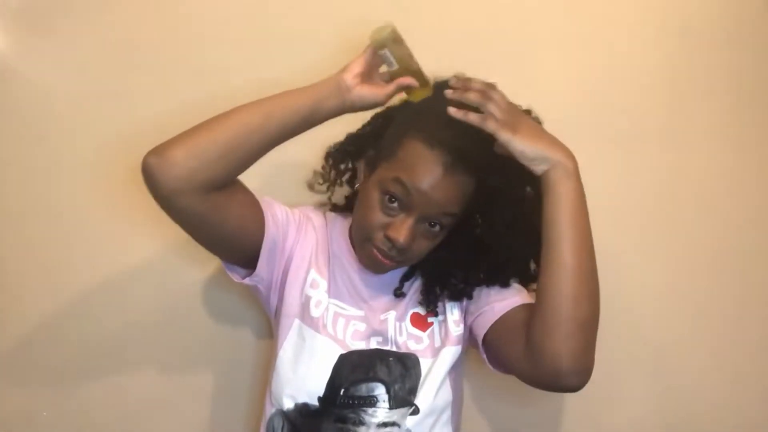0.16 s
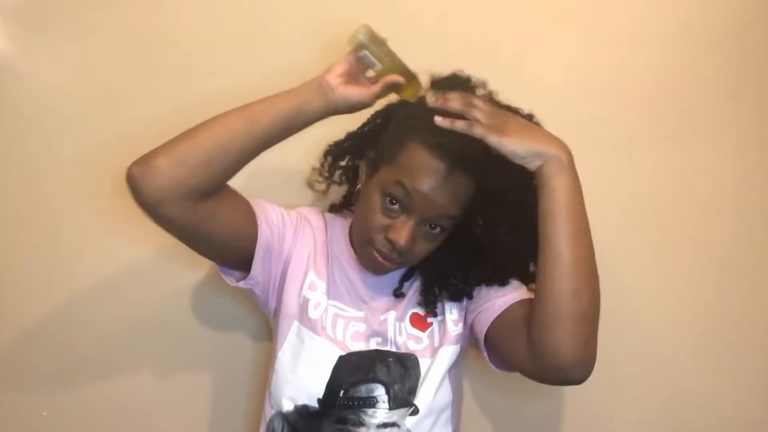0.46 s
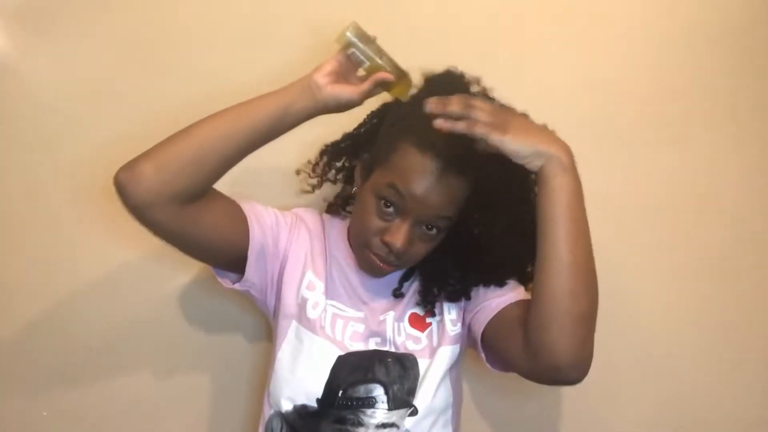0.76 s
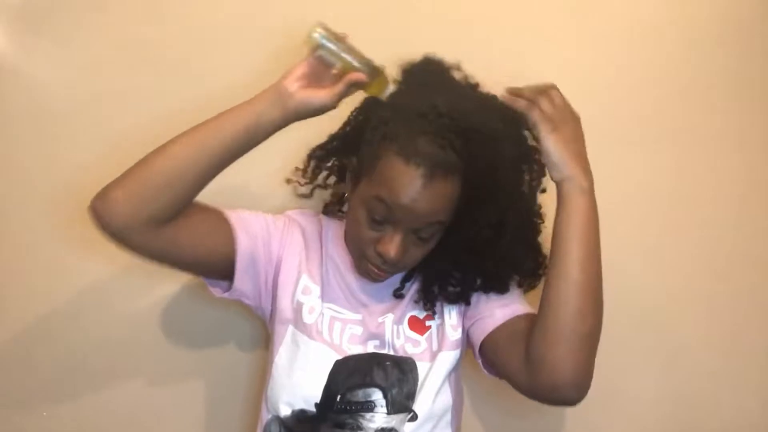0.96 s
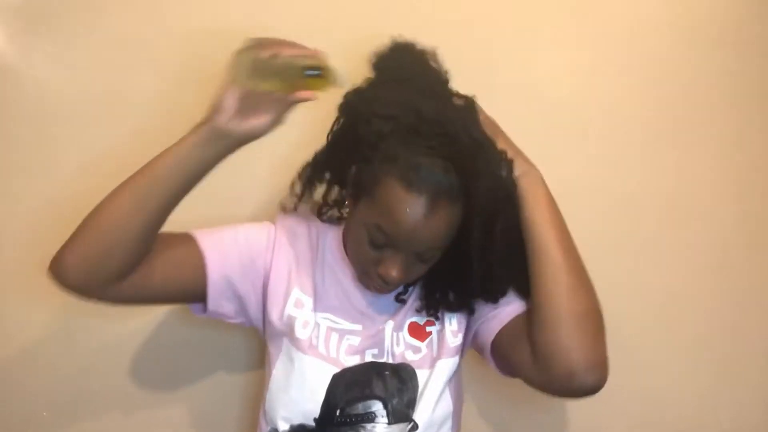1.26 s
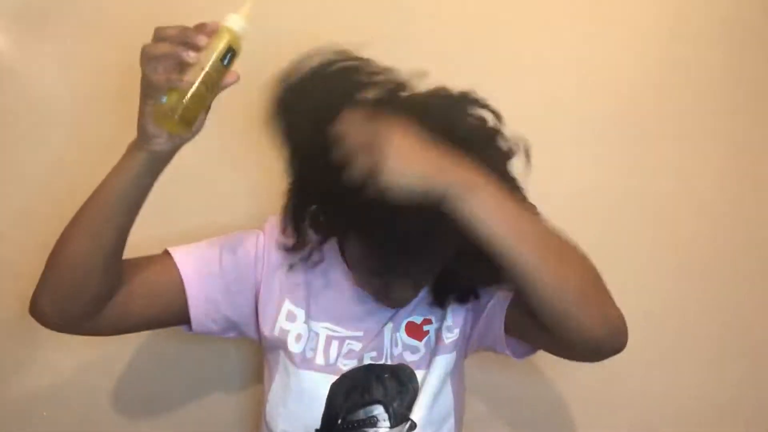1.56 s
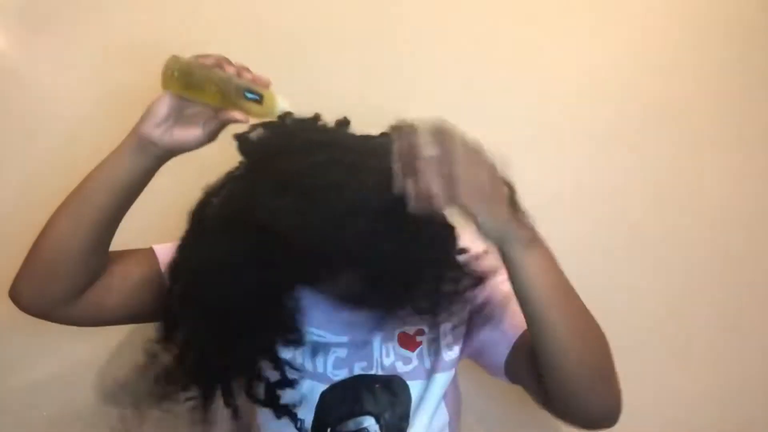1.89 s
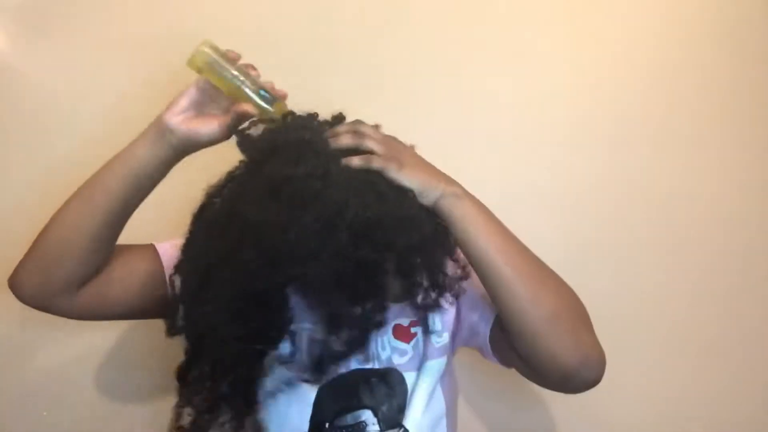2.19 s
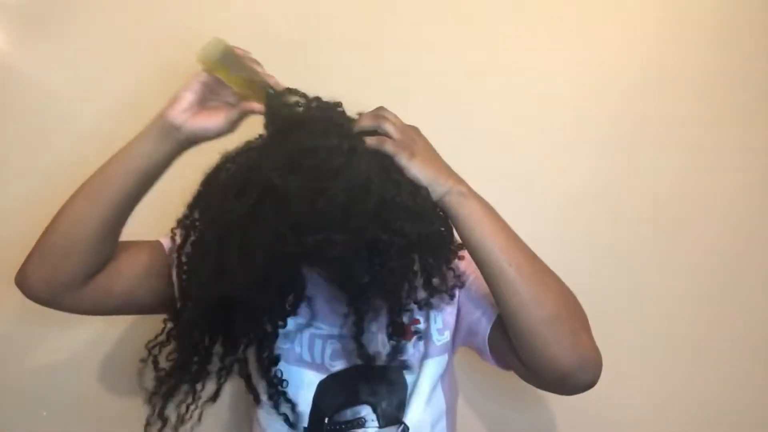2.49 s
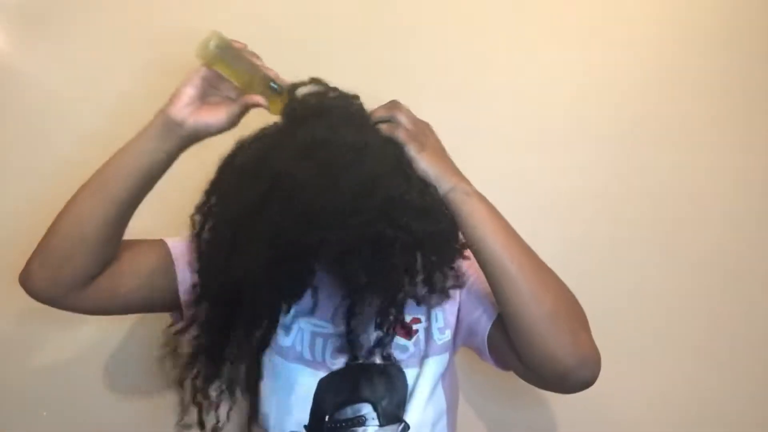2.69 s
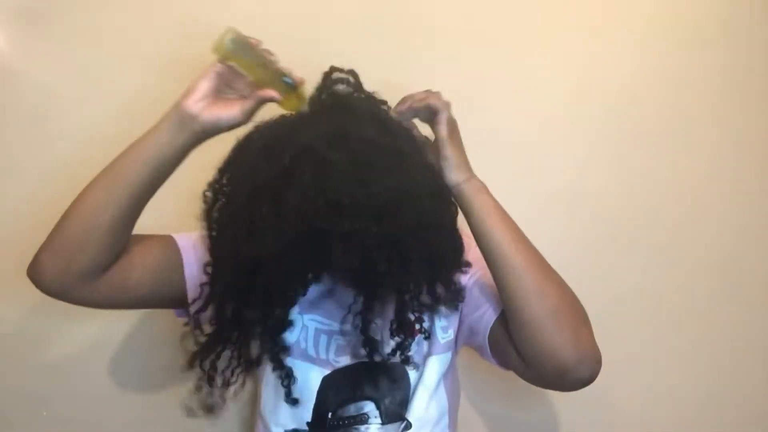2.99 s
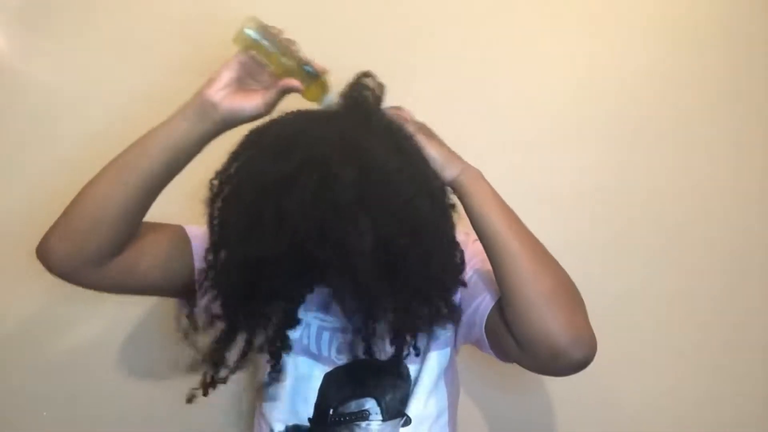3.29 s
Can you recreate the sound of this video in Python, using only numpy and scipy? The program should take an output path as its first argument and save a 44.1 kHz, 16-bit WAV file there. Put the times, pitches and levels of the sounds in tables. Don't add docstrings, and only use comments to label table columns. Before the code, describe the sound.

Fingertips rub a scalp through thick curly hair in soft uneven rustles, with sharp ticks and a few tiny bottle glugs midway, then fuller strokes; close small room, low air rumble, mono microphone.

```python
import sys
import numpy as np
from scipy import signal
from scipy.fft import rfft, irfft
from scipy.io import wavfile

SR = 44100
rng = np.random.default_rng(int(sys.argv[2]) if len(sys.argv) > 2 else 0)


def ratio_of_db(decibels):
    return 10 ** (np.asarray(decibels, float) / 20)


def wav_record(signal):
    frames = np.transpose(np.atleast_2d(signal))
    bounded = np.clip(frames, -1, 1)
    quanta = np.round(bounded * 32767).astype(np.int16)
    wavfile.write(sys.argv[1], SR, quanta)


N = 152145


def rms_one(x):
    return x / np.sqrt(np.mean(x ** 2) + 1e-20)


def coloured_noise(spectrum):
    hz, db = np.transpose(spectrum)
    bins_hz = np.maximum(np.fft.rfftfreq(N, 1 / SR), 1)
    gain = ratio_of_db(np.interp(np.log(bins_hz), np.log(hz), db))
    return rms_one(irfft(rfft(rng.standard_normal(N)) * gain, N))


def drift(rate_hz):
    r = np.exp(-2 * np.pi * rate_hz / SR)
    wander = signal.lfilter([1], [1, -2 * r, r * r], rng.standard_normal(N + SR))
    return rms_one(wander[SR:])


def resonate(x, pitch_hz, width_hz):
    r = np.exp(-np.pi * width_hz / SR)
    numerator = (1 - r * r) / 2 * np.array([1, 0, -1])
    return signal.lfilter(numerator, [1, -2 * r * np.cos(2 * np.pi * pitch_hz / SR), r * r], x)


def add(out, start_s, sound):
    i = int(start_s * SR)
    out[i:i + len(sound)] += sound[:len(out) - i]


def sine(pitch_hz):
    return np.sqrt(2) * np.sin(2 * np.pi * pitch_hz * np.arange(N) / SR)


# pitch_hz [Hz], level_db [dB per Hz]
RUMBLE_SPECTRUM = [(15, -102), (25, -30), (71, -3.5), (118, 1.5), (330, -14), (435, -20.5), (482, -16.5),
                   (525, -22), (800, -32.5), (1040, -33.5), (1760, -120)]
# pitch_hz [Hz], level_db [dB per Hz]
AIR_HISS = [(300, -40),
            (600, 0), (1000, -4), (1500, -9.5), (2600, -11.5), (5000, -15.5), (7800, -18.5),
                 (8300, -21.5), (16000, -24)]
# pitch_hz [Hz], width_hz [Hz], level_db [dB]
ROOM_MODES = [(83.2, 17.5, -52), (118.1, 18, -50), (171.2, 6.8, -57.5), (287.7, 19, -66), (321.6, 39, -60),
              (359.8, 9.1, -64.5),
              (217.3, 10.8, -66)]


def air_system():
    rumble = ratio_of_db(-46.5 + 1.24 * drift(3.6)) * coloured_noise(RUMBLE_SPECTRUM)
    hiss = ratio_of_db(-65 + 0.4 * drift(8.1)) * coloured_noise(AIR_HISS)
    hum = ratio_of_db(-61.5 + 1.2 * drift(3.2)) * sine(480)
    whine = ratio_of_db(-94) * sine(9438)
    out = rumble + hiss + hum + whine
    for pitch_hz, width_hz, level_db in ROOM_MODES:
        noise = rng.standard_normal(N + SR)
        noise = resonate(resonate(noise, pitch_hz, width_hz), pitch_hz, width_hz)
        out += ratio_of_db(level_db) * rms_one(noise[SR:])
    return out


# middle_s [s], length_s [s], level_db [dB], brightness_db [dB]
STROKES = [(0.082, 0.1, -70, 6), (0.351, .1, -67, -2), (0.452, 0.08, -67, 6.5), (0.569, 0.077, -68, -6),
           (0.68, 0.1, -67.5, 8.5), (0.792, 0.03, -68, 3), (0.912, 0.095, -65, -1), (1.006, 0.16, -67, 0),
           (1.209, 0.043, -57, -10), (1.221, 0.033, -55.5, -16), (1.308, 0.14, -65.5, 6),
           (1.377, 0.16, -79.5, 22.5), (1.579, 0.6, -74, 18), (2.104, 0.096, -66.5, 6.5),
           (2.195, 0.12, -64, 7.5), (2.459, 0.15, -57, -2.5), (2.706, 0.24, -64, -1),
           (2.821, 0.095, -65.5, -1), (2.883, 0.12, -62, 2.5), (2.981, 0.15, -58.5, -0.5),
           (3.002, 0.056, -53.5, -12), (3.039, 0.05, -60, -7), (3.126, 0.15, -61.5, 0.5),
           (3.226, 0.07, -57, -3), (3.262, 0.11, -58.5, 1), (3.378, 0.14, -66, -2), (1.123, .12, -75, 9),
           (1.795, 0.14, -75, 12.5), (3.445, 0.051, -85, 9)]
# pitch_hz [Hz], width_hz [Hz], level_db [dB], brightness_share [0-1]
HAIR_RESONANCES = [(1208, 200, -8, 0.65), (2230, 1000, -0.5, 0), (2683, 130, -10, 0.1),
                   (1850, 220, -12, 0.26), (2940, 1100, -19.5, 1), (4700, 1660, -10.5, 0.65),
                   (7800, 970, -17.5, 0.5), (11600, 7800, -18, 0.94), (6440, 2700, -21.5, 0.84)]


def finger_strokes():
    slips_per_s, slip_spread_db = 3000, 3.2
    t, out = np.arange(N) / SR, np.zeros(N)
    flicker = ratio_of_db(1.0 * drift(36.0))
    for pitch_hz, width_hz, level_db, share in HAIR_RESONANCES:
        sizes = ratio_of_db(slip_spread_db * np.minimum(rng.exponential(1, N), 5))
        sizes = sizes * rng.choice([-1, 1], N)
        slips = rms_one(sizes * (rng.random(N) < slips_per_s / SR))
        power = np.zeros(N)
        for middle_s, length_s, stroke_db, bright_db in STROKES:
            swell = np.exp(-8 * ((t - middle_s) / length_s) ** 2)
            power += ratio_of_db(2 * (stroke_db + share * bright_db)) * swell ** 2
        rustle = resonate(resonate(slips, pitch_hz, width_hz), pitch_hz, 2 * width_hz)
        out += ratio_of_db(level_db) * rms_one(rustle) * np.sqrt(power) * flicker
    return out


# start_s [s], peak_db [dB], pitch_hz [Hz], t60_s [s]
TICKS = [(1.2956, -38, 6900, 0.006), (1.2957, -44, 4200, 0.0025), (1.2959, -44, 2350, .008),
         (1.2981, -44, 6300, 0.0065), (1.3023, -34, 3580, 0.0054), (1.3021, -31.5, 2690, 0.0051),
         (1.302, -48, 4250, 0.0068), (1.3038, -44, 3730, 0.0089), (1.3045, -51, 6800, 0.0098),
         (1.305, -48.5, 930, 0.054), (1.3076, -34, 2630, 0.006), (1.3088, -41, 1800, 0.013),
         (1.3078, -46.5, 1320, 0.061), (1.3165, -46, 1750, 0.01), (1.4663, -31.5, 7000, 0.0032),
         (1.467, -38, 1060, 0.014), (1.4668, -35, 4360, 0.0056), (1.4662, -33, 2900, 0.008),
         (1.4685, -33, 3020, 0.0065), (1.467, -36.5, 1660, 0.025), (1.475, -38, 3800, 0.005),
         (1.4765, -39, 3570, .006), (1.4823, -44, 2920, .008), (1.4867, -45, 7260, 0.0059),
         (1.4874, -43, 4400, 0.0057), (1.4945, -49, 7700, 0.007), (1.4988, -46, 3200, .006),
         (1.4915, -38.5, 7500, 0.0057), (2.144, -38.5, 5100, 0.0054), (2.144, -34, 3000, .005),
         (2.1463, -20.5, 2035, 0.011), (2.147, -33, 2730, 0.015), (2.1461, -39, 3400, .012),
         (2.146, -31.5, 4560, 0.0092), (2.149, -46, 714, 0.018), (2.1547, -42, 2400, .01),
         (2.1758, -45, 4900, .004), (2.1793, -40.5, 7300, .005), (2.1789, -45, 11500, 0.0027),
         (2.188, -48, 8400, 0.0036), (2.2859, -31.5, 1960, 0.0061), (2.2862, -39, 617, 0.013),
         (2.2864, -45, 4200, 0.0045), (2.188, -50, 12100, .004), (2.8818, -44, 2190, .012),
         (3.0005, -40.5, 2600, 0.0094), (3.0002, -36.5, 1850, 0.013), (3.006, -42, 1800, 0.01),
         (3.007, -48, 2680, .007)]
# start_s [s], peak_db [dB], pitch_hz [Hz]
SNAPS = [(.551, -56, 2530), (.658, -55, 2710), (.791, -57, 2380), (.903, -53, 2430), (1.186, -57, 1970),
         (1.206, -46, 2230), (2.374, -52, 2240), (2.404, -49, 2350), (2.428, -56, 2240), (2.792, -56, 2070),
         (2.802, -56, 2550), (2.955, -50, 2220), (3.002, -50, 4700), (3.014, -44, 2620), (3.047, -50, 2660),
         (3.058, -50, 2700), (3.092, -52, 2640), (3.22, -45, 2140), (3.368, -54, 2650),
         (1.6115, -49.5, 2276), (2.317, -52, 1950), (.356, -62, 4300), (.449, -52, 2400), (.918, -56, 3800),
         (1.218, -46, 2600), (2.176, -50, 2100), (2.455, -46, 2300)]


def ticks_and_snaps():
    snap_t60_s, crack_t60_s, crackle_t60_s = 0.014, 0.0018, 0.04
    crack_db, crackle_db = 0, -14
    rise_cycles = 1.6
    out, t = np.zeros(N), np.arange(5000) / SR
    snaps = [(*snap, snap_t60_s) for snap in SNAPS]
    for start_s, peak_db, pitch_hz, t60_s in [*TICKS, *snaps]:
        rise = np.sin(np.pi / 2 * np.minimum(t * pitch_hz / rise_cycles, 1)) ** 2
        ring = np.sin(2 * np.pi * pitch_hz * t) * ratio_of_db(-60 * t / t60_s) * rise
        crack = ratio_of_db(crack_db - 60 * t / crack_t60_s) * rng.standard_normal(5000)
        crack += ratio_of_db(crackle_db - 60 * t / crackle_t60_s) * rng.standard_normal(5000) ** 3 / 4
        width_hz = 0.45 * pitch_hz
        crack = resonate(resonate(crack, pitch_hz, width_hz), pitch_hz, width_hz)
        crack *= 2 * np.sqrt(SR / 10 / pitch_hz)
        add(out, start_s, ratio_of_db(peak_db) * (ring + crack))
    return out


# start_s [s], level_db [dB], pitch_hz
# [Hz], width_hz [Hz], t60_s [s]
SETTLING = [
    (1.297, -62, 3600, 1500, .25),
    (1.4657, -55, 12600, 7000, 0.044),
    (1.468, -50, 3020, 905, 0.29),
    (1.468, -58, 4870, 1500, .3),
    (1.47, -75, 5220, 250, 2.0),
    (1.471, -60, 8000, 4000, 0.17),
    (2.1443, -56.5, 12000, 8000, .05),
    (2.148, -57.5, 2700, 700, .4),
    (2.149, -57, 4600, 900, 0.22),
]


def settling_strands():
    out, t = np.zeros(N), np.arange(SR // 2) / SR
    for start_s, level_db, pitch_hz, width_hz, t60_s in SETTLING:
        slips = rng.standard_normal(len(t)) ** 3
        crackle = resonate(resonate(slips, pitch_hz, width_hz), pitch_hz, 2 * width_hz)
        add(out, start_s, ratio_of_db(level_db - 60 * t / t60_s) * rms_one(crackle))
    return out


# start_s [s], peak_db [dB], pitch_hz [Hz], t60_s [s], glide_hz_per_s [Hz/s]
GLUGS = [(1.6134, -41, 1290, 0.025, 506), (2.1472, -36.5, 1140, 0.026, 0),
         (2.1472, -49, 7400, 0.021, 20000), (2.1793, -40, 1130, 0.041, 0), (2.187, -54, 1135, .07, 0),
         (2.2, -58, 920, .07, 0), (2.2875, -35.5, 1080, 0.025, 0), (2.2865, -51, 3200, 0.045, 25000),
         (2.286, -63.5, 5970, .035, 15000), (2.2863, -62, 8200, 0.018, 0), (2.287, -38, 920, 0.025, 0),
         (2.2945, -41, 1070, 0.04, -3000), (2.5, -60, 3600, 0.04, 15000), (2.288, -47, 80, .4, 0),
         (2.312, -51, 1090, 0.03, 4000)]


def bottle_glugs():
    attack_s, wobble_db = 0.0015, 1.5
    out, t = np.zeros(N), np.arange(6000) / SR
    for start_s, peak_db, pitch_hz, t60_s, glide_hz_per_s in GLUGS:
        envelope = ratio_of_db(peak_db - 60 * t / t60_s) * (1 - np.exp(-t / attack_s))
        wobble = ratio_of_db(wobble_db * drift(54.0)[:len(t)])
        cycles = pitch_hz * t + glide_hz_per_s * t * t / 2
        add(out, start_s, envelope * wobble * 2 * np.sin(2 * np.pi * cycles))
    return out


def room(x):
    level_db, t60_s, gap_s, cut_hz = -16, 0.36, 0.004, 9000
    t = np.arange(SR // 2) / SR
    tail = rng.standard_normal(len(t)) * ratio_of_db(-60 * t / t60_s) * (t > gap_s)
    tail = signal.sosfilt(signal.butter(1, cut_hz, fs=SR, output="sos"), tail)
    tail /= np.sqrt(np.sum(tail ** 2))
    return ratio_of_db(level_db) * signal.fftconvolve(x, tail)[:N]


def scene():
    near = ticks_and_snaps() + bottle_glugs()
    background = air_system()
    rubbing = finger_strokes()
    settling = settling_strands()
    return (background + rubbing + settling + near + room(near))[None]


def roll_off(x):
    return signal.sosfilt(signal.butter(12, 16460, fs=SR, output="sos"), x)


# middle_s [s], low_hz [Hz], high_hz [Hz], depth_db [dB]
DROPOUTS = [(.247, 6400, 18000, -16), (.247, 2700, 4700, -12), (.417, 3000, 3700, -12),
            (1.036, 3300, 3600, -10), (1.269, 1600, 1900, -8), (.417, 7600, 18000, -16),
            (.417, 4700, 6200, -12), (.972, 7700, 11000, -14), (.972, 11700, 18000, -14),
            (.972, 5600, 6900, -12), (1.036, 4700, 15500, -13), (1.271, 7300, 12800, -12),
            (1.271, 13500, 18000, -12), (1.271, 3900, 5000, -10), (1.57, 5700, 18000, -20),
            (1.57, 1600, 2500, -14), (1.579, 1600, 2200, -8), (1.57, 3600, 4000, -10),
            (3.319, 10000, 18000, -14), (3.319, 8200, 9400, -12), (3.319, 5300, 6200, -12)]


def record(dry):
    dropout_s, deepen = 0.017, 1.8
    t, out = np.arange(N) / SR, dry.copy()
    for middle_s, low_hz, high_hz, depth_db in DROPOUTS:
        band_filter = signal.butter(4, [low_hz, high_hz], "band", fs=SR, output="sos")
        band = signal.sosfiltfilt(band_filter, out)
        dip = np.exp(-(2 * (t - middle_s) / dropout_s) ** 2)
        out = out - (1 - ratio_of_db(deepen * depth_db)) * dip * band
    out = signal.sosfilt(signal.ellip(12, 0.5, 45, 15830, fs=SR, output="sos"), out)
    out = signal.sosfilt(signal.butter(2, 38.3, "high", fs=SR, output="sos"), out)
    return roll_off(out)


dry = scene()
out = record(dry)
wav_record(out)
```